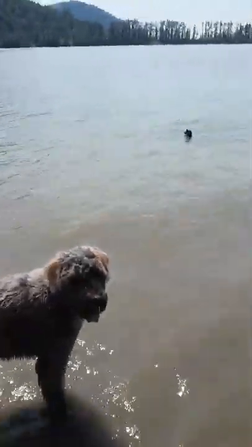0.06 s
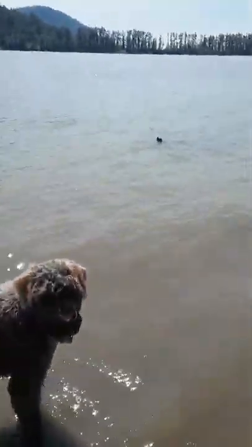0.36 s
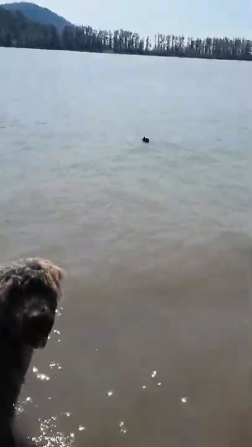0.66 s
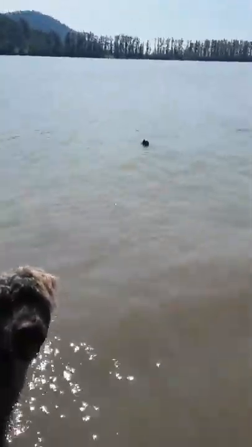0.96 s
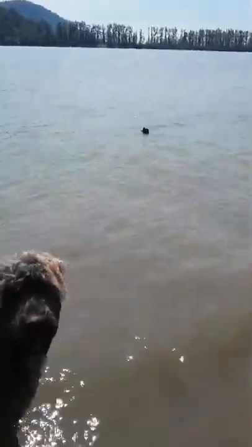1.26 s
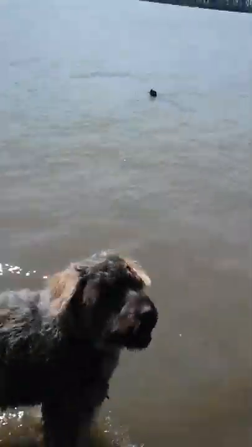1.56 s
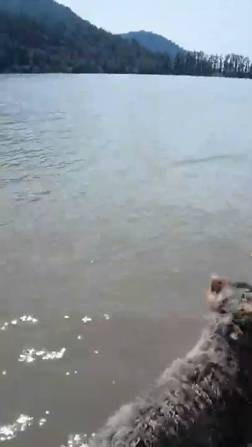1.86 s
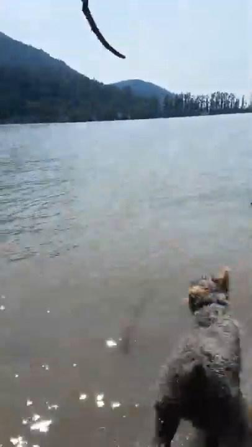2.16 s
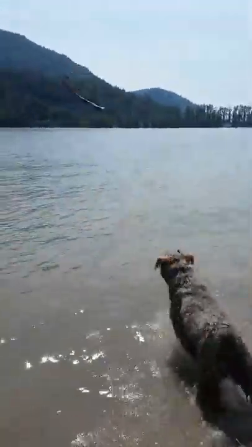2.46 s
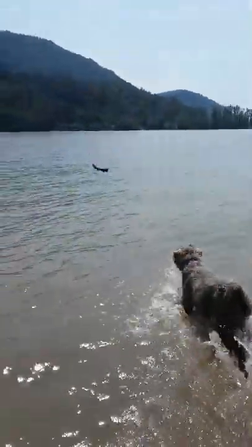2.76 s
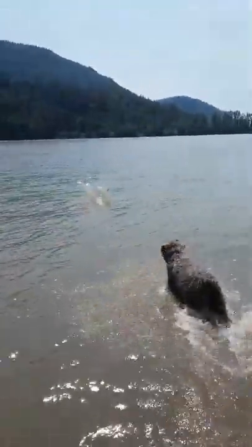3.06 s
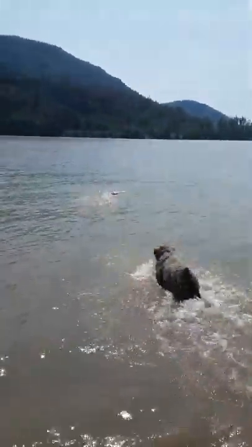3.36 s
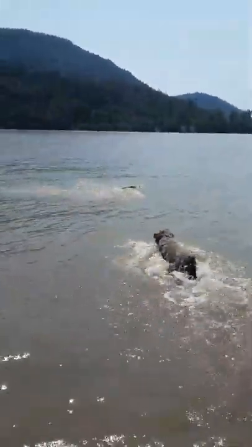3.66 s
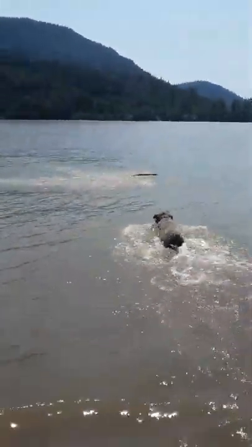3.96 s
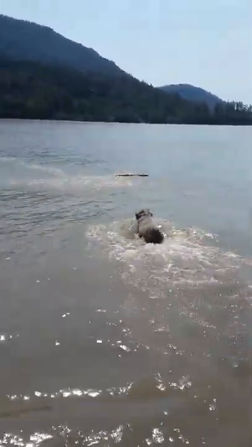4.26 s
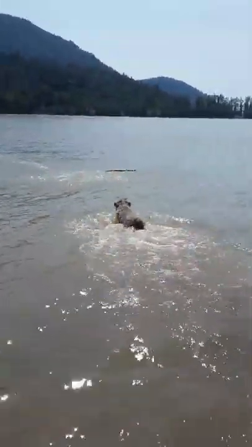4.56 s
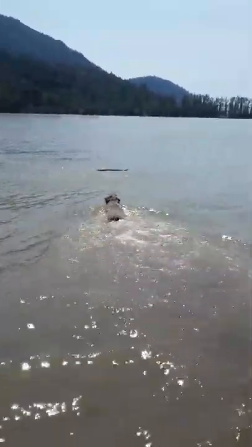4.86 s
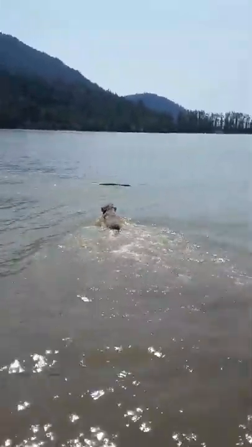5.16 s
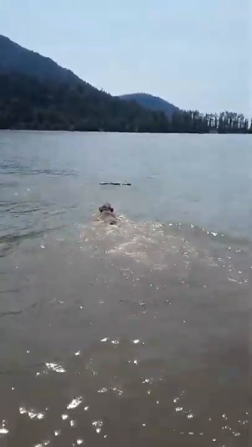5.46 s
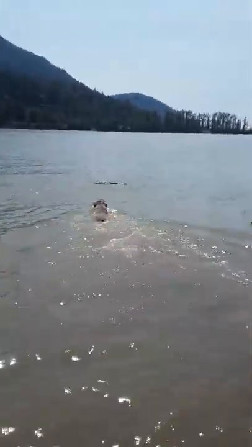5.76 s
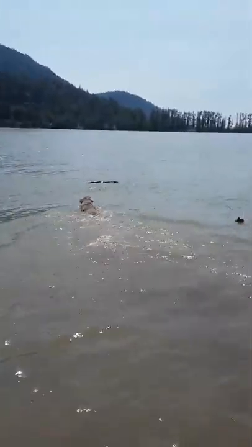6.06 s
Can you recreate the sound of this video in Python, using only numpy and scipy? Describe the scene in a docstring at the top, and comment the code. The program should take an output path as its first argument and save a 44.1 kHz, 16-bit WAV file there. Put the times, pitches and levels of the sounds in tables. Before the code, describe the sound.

Low gusts thump the microphone as a dog bounds through shallow water, then swims off amid small waves.

```python
"""Dog in a windy river

A dog bounds into the shallows of a wide river after a stick and paddles away. Wavelets lap at the shore;
its legs throw spray, churn up ringing bubbles and leave plops and falling drops.
Gusts of wind hit the microphone as a stream of eddies, each a low thump."""
import sys
import numpy as np
from scipy import signal
from scipy.fft import rfft, irfft, next_fast_len
from scipy.io import wavfile
from scipy.ndimage import uniform_filter1d, map_coordinates

SR = 44100
rng = np.random.default_rng(int(sys.argv[2]) if len(sys.argv) > 2 else 0)


def to_wav(sig):
    """Store sig (one row per channel, or 1-D mono) as 16-bit WAV at the path in sys.argv[1].

    Samples outside -1..1 are clipped; the rate is SR.
    """
    pcm = np.clip(np.atleast_2d(sig), -1, 1) * 32767
    pcm = np.round(pcm).astype(np.int16)
    wavfile.write(sys.argv[1], SR, pcm.T)  # frames by channels


N = 278579
TIME = np.arange(N) / SR


def amp(db):
    """Decibels to gain."""
    return 10 ** (np.asarray(db) / 20)


def unit(x):
    """Scale to rms 1."""
    return x / np.sqrt(np.mean(x ** 2) + 1e-20)


def automation(points):
    """A per-sample curve through (time, value) points."""
    return np.interp(TIME, *np.transpose(points))


def wobble(rate):
    """Smooth random modulation, rate knots a second."""
    return map_coordinates(rng.standard_normal(1024), [TIME * rate], mode="wrap")


def swells(peak_s, db, rise, fall, hold_s=0):
    """Envelopes in dB, one a row, that rise, hold and fall; slopes in dB per second."""
    return db - rise * np.maximum(peak_s - TIME, 0) - fall * np.maximum(TIME - peak_s - hold_s, 0)


def together(*levels_db):
    """Power sum in dB of independent layers."""
    rows = np.vstack([np.broadcast_to(level, np.shape(level)[:-1] + (N,)) for level in levels_db])
    power = 10 ** (np.maximum(rows, -150) / 10)
    return 10 * np.log10(power.sum(axis=0))


def filtered(x, response):
    """Zero-phase EQ; response gives the gain at each frequency."""
    size = next_fast_len(N + SR // 2)
    return irfft(rfft(x, size) * response(np.fft.rfftfreq(size, 1 / SR)), size)[:N]


def coloured(x, eq):
    """x through an EQ curve of (Hz, dB) points, at rms 1."""
    points_hz, db = np.transpose(eq)
    return unit(filtered(x, lambda hz: amp(np.interp(np.log(hz + 1), np.log(points_hz), db))))


def scatter(starts, shapes):
    """Mix short sounds, one a row, at their start times."""
    first = np.maximum(np.round(np.reshape(starts, (-1, 1)) * SR).astype(int), 0)
    index = first + np.arange(shapes.shape[1])
    return np.bincount(index.ravel(), shapes.ravel(), N)[:N]


def eddies(times, gains, widths, size=768):
    """Rounded pressure dips; the narrower, the brighter."""
    t = (np.arange(size) - size // 2) / SR
    dips = -gains / np.cosh(np.minimum(np.abs(t / widths), 20))
    return scatter(times - size / 2 / SR, dips)


def port(x, corner_hz):
    """The microphone port passes no steady pressure, so each dip swings back."""
    swing = signal.sosfilt(signal.butter(2, corner_hz, "highpass", fs=SR, output="sos"), x)
    return filtered(swing, lambda hz: 1 / np.sqrt(1 + (56 / (hz + 1)) ** 10))  # sub cut at 56 Hz


# Gust cues: (start [s], hold [s], level [dB])
GUSTS = [(0, 0.091, -25), (0.199, 0.22, -20.5), (0.452, 0.25, -13), (0.722, 0.22, -17), (.93, 0.346, -13.5),
         (1.294, .17, -18), (1.922, 0.12, -15), (2.207, 0.022, -15.5), (2.288, 0.19, -15.5),
         (2.498, .15, -20), (2.712, 0.018, -26), (2.936, 0.4, -35), (3.403, 0.038, -27.5),
         (3.952, 0.055, -26), (4.177, .16, -23.5), (4.463, .05, -27), (4.59, 0.018, -21),
         (4.801, 0.15, -24.5), (5.093, 0.395, -26.5), (5.217, 0.13, -25), (5.511, .12, -20.5),
         (5.671, .02, -22.5), (5.889, 0.091, -25), (5.981, 0.061, -20), (6.188, .03, -28),
         (6.286, 0.034, -23.5)]


def gusting(breeze_db=-43.5, flutter_db=1.5):
    """Wind envelope in dB: gusts hit fast, hold and drop into a turbulent tail over a bed of breeze."""
    start, hold, db = np.transpose(GUSTS)[:, :, None]
    gusts = swells(start, db, rise=700, fall=524, hold_s=hold)
    tails = swells(start, db - 12, rise=700, fall=80, hold_s=hold).max(axis=0)
    return together(gusts, tails, breeze_db) + flutter_db * wobble(rate=19)


def wind(gust_db, width_s=0.00092, narrowing_db=29, scatter_db=5, ceiling=0.49, count=2200):
    """A rumbling stream of eddies: tighter and brighter in a strong gust, sputtering in a light one."""
    times = (np.arange(count)[:, None] + 2 * rng.random((count, 1)) - 1) * N / SR / count
    strength, breadth = rng.standard_normal((count, 2)).T[:, :, None]
    force_db = np.interp(times, TIME, gust_db) + 20
    widths = width_s * np.exp(0.3 * breadth - np.maximum(force_db, -10) / narrowing_db)
    unevenness_db = scatter_db * np.interp(force_db, [0, 6], [1, .65])
    flow = port(eddies(times, amp(unevenness_db * strength), widths), corner_hz=92)
    power = uniform_filter1d(uniform_filter1d(flow ** 2, size=2000), size=2000)
    pressure = amp(gust_db - 0.02) * flow / np.sqrt(np.abs(power) + 1e-9)
    # soft clip: the diaphragm yields less to the hardest pushes
    return pressure / (1 + (pressure / ceiling) ** 4) ** (1 / 4)


# Fader ride of the shoreline bed: (time [s], relative level [dB])
LAPPING = [(0, -38), (.3, -40), (.95, -47.5), (1.35, -41.5), (3.7, -42), (4.1, -38), (4.75, -36),
           (5.3, -42), (5.8, -42), (6.3, -47.5)]


def lapping():
    """Wavelets lap at the shore: splash, spray and mist envelopes in dB."""
    lap_db = automation(LAPPING)
    return lap_db, lap_db - 8, lap_db - 39


def ringing(hz, cycles, rise, size=4000):
    """Bubbles, one a row: each dies 60 dB over some cycles and bends up as it nears the surface."""
    turns = hz * np.arange(size) / SR
    age = turns / cycles
    tone = np.sin(2 * np.pi * turns * (1 + rise * age / 2))
    return tone * amp(-60 * age) * (1 - np.exp(-2 * turns))


def bubbles(low_hz, high_hz, cycles, spread_db, count, size):
    """A cloud of bubbles of random size and strength, at rms 1."""
    when, pitch, strength, life = rng.random((count, 4)).T[:, :, None]
    hz = low_hz * (high_hz / low_hz) ** pitch
    gain = amp(-spread_db * np.log(np.maximum(strength, .01))) * hz / high_hz
    rings = ringing(hz, cycles * (.5 + life), rise=0.31, size=size)
    return unit(scatter(when * N / SR, gain * rings))


# EQ for the body of a splash: (frequency [Hz], gain [dB])
SPLASH_EQ = [(120, -30), (300, 4.5), (600, -2), (900, -2), (1300, -2), (2000, -4), (2600, -5.5),
             (3100, -9.5), (3500, -18), (5000, -20.5), (9000, -37)]
# EQ for the sizzle of spray: (frequency [Hz], gain [dB])
SPRAY_EQ = [(2200, -2), (3600, -3), (4800, -2), (5800, -2.5), (6900, 0), (8500, -6), (10000, -13),
            (12500, -27), (15800, -31)]


def splashing(splash_db, spray_db, mist_db):
    """Sheets of water break into a bubbly body and fizzy spray that surge together, with mist on top."""
    surge = wobble(rate=22)
    gurgle = bubbles(low_hz=614, high_hz=3654, cycles=34, spread_db=2, count=7000, size=1100)
    splash = coloured(gurgle + 2.35 * rng.standard_normal(N), SPLASH_EQ)
    fizz = bubbles(low_hz=2870, high_hz=14870, cycles=40, spread_db=3.5, count=16000, size=200)
    spray = coloured(fizz + 1.5 * rng.standard_normal(N), SPRAY_EQ)
    mist = coloured(rng.standard_normal(N), [(6000, -24), (10000, 0), (13000, -8), (15800, -15)])
    patter = wobble(rate=70)
    return (amp(splash_db + 2 + 0.64 * surge) * splash
            + amp(spray_db + 0.54 + .5 * surge + 0.66 * patter) * spray
            + amp(mist_db + 1.5 * patter) * mist)


# Hard wind hits: (time [s], relative level [dB])
BUFFETS = [(0.19, -3.5), (0.509, -1.5), (0.592, -7), (0.668, -6), (0.828, -5.5), (0.902, -5.5),
           (1.029, -4.5), (1.101, -2), (1.3, -6.5), (1.357, -7), (1.407, -6.5), (1.896, -5), (1.922, -1),
           (1.972, 5), (1.983, -2), (2.034, -7.5), (2.208, -5.5), (2.224, -4.5), (2.279, -6), (2.327, -4.5),
           (2.375, -5), (2.874, -11), (4.513, -3.5), (4.592, -6.5), (5.511, -11.5), (5.582, -5.5),
           (5.624, -8), (5.684, -5)]


def buffets(gust_db, width_s=0.00072, narrowing_db=20):
    """Single hard eddies thump the port, punchiest in strong wind."""
    times, db = np.transpose(BUFFETS)[:, :, None]
    smoothed_db = uniform_filter1d(gust_db, size=8000)
    force_db = np.maximum(np.interp(times, TIME, smoothed_db) + 28.5, 0)
    widths = width_s * np.exp(-force_db / narrowing_db)
    return port(eddies(times + 0.0008, amp(db + 2), widths), corner_hz=80.6)


def puffs(count, t60, attack_s, low_hz, high_hz, size=4000):
    """Wet transients of breaking water: band-passed noise bursts, one a row."""
    t = np.arange(size) / SR
    burst = rng.standard_normal((count, size)) * amp(-60 * t / t60) * (1 - np.exp(-t / attack_s))
    band = signal.butter(2, [low_hz, high_hz], "bandpass", fs=SR, output="sos")
    return signal.sosfilt(band, burst) * np.sqrt(SR / 2 / (high_hz - low_hz))


# Close-up drips: (time [s], level [dB], pitch [Hz])
DROPS = [(0.2553, -30.5, 7040), (0.3227, -34, 6400), (0.538, -39, 4040), (0.5766, -37, 6450),
         (1.1204, -37.5, 4800), (1.166, -31, 6900), (1.2794, -29.5, 6700), (1.339, -36, 6500),
         (1.8056, -22.5, 4700), (3.018, -19, 7000), (4.744, -28.5, 6500), (5.027, -30.5, 6100),
         (5.193, -28.5, 6300)]


def drops():
    """Each drop ticks on the surface, rings a tiny bubble and scatters a brief patter."""
    times, db, hz = np.transpose(DROPS)[:, :, None]
    tick = puffs(len(times), t60=0.015, attack_s=0.0013, low_hz=5500, high_hz=9400)
    ring = ringing(hz, cycles=97, rise=0.073)
    patter = puffs(len(times), t60=0.065, attack_s=0.01, low_hz=5000, high_hz=8400)
    return scatter(times, amp(db) * (tick + ring + amp(-4.5) * patter))


# Foreground wavelets, relative levels: (crest [s], spray [dB], mist [dB], gurgle [dB])
BREAKERS = [(.28, -49, -62, -56.5), (4.72, -41, -68, -45), (5.09, -42.5, -54, -38.5)]


def breakers():
    """Wavelets swell and break close by: spray, mist and gurgle envelopes in dB."""
    crest, spray_db, mist_db, gurgle_db = np.transpose(BREAKERS)[:, :, None]
    swell_db = swells(crest, 0, rise=38, fall=71)
    return swell_db + spray_db, swell_db + mist_db, swell_db + gurgle_db


# Fader ride of the legs underwater, wading in and swimming off: (time [s], relative level [dB])
PADDLING = [(1.55, -59), (1.85, -39), (2.6, -38.5), (3.1, -34), (4.0, -40), (4.4, -58), (6.3, -82)]
# EQ for the low end of stirred water: (frequency [Hz], gain [dB])
CHURN_EQ = [(100, -10), (250, 4), (450, 2), (620, 0.5), (820, 2), (1050, -6.5), (1600, -11), (3000, -30)]


def churning(gurgle_db):
    """Breaking wavelets and the dog's legs drag air under: a dense wash of big, low bubbles."""
    churn_db = together(automation(PADDLING), gurgle_db)
    cloud = bubbles(low_hz=205.7, high_hz=1253, cycles=7.6, spread_db=-0.5, count=3500, size=1400)
    envelope = amp(churn_db + 2 + 1.23 * wobble(rate=7.5))
    return envelope * coloured(cloud + 1.5 * rng.standard_normal(N), CHURN_EQ)


# Big single bubbles: (time [s], relative level [dB], nominal pitch [Hz])
PLOPS = [(1.281, -21, 880), (1.290, -23, 2450), (1.599, -23, 706), (1.807, -14.5, 2600), (1.824, -15, 1174),
         (1.833, -14.5, 1640), (1.894, -14, 904), (2.039, -18, 2630), (2.130, -15.5, 838),
         (2.888, -19.5, 1166), (4.173, -23, 994), (4.356, -23.5, 1190), (4.795, -21, 2730),
         (5.077, -24, 1040), (5.112, -24, 590), (5.126, -25, 776), (5.138, -21.5, 1007),
         (5.335, -28.5, 834), (5.843, -26, 664)]


def plops(tuning=0.92):
    """Air pockets close with a short wet slap and ring with a rising note."""
    times, db, hz = np.transpose(PLOPS)[:, :, None]
    ring = ringing(tuning * hz, cycles=58.7, rise=0.66)
    slap = puffs(len(times), t60=0.08, attack_s=0.0011, low_hz=700, high_hz=2720)
    return scatter(times, amp(db - 2.5) * ring + amp(db - 12.5) * slap)


# The dog's leaps, relative levels: (peak [s], splash [dB], spray [dB], mist [dB], splash fade [dB/s])
LUNGES = [(1.692, -32.5, -41.5, -72, 80), (1.81, -32, -33, -52, 36), (2.108, -31, -33.5, -56, 12),
          (2.25, -36.5, -36, -52, 23.5), (2.44, -34, -40, -59, 12.5), (2.9, -37.5, -42, -54, 19.5)]


def lunges(rise_db_per_s=166):
    """The dog crashes into the water: splash, spray and mist envelopes in dB."""
    peak, splash_db, spray_db, mist_db, fade = np.transpose(LUNGES)[:, :, None]
    body_db = swells(peak, 0, rise_db_per_s, fade)
    airborne_db = swells(peak, 0, rise_db_per_s, fade - 0.5)  # hangs a touch longer
    return body_db + splash_db, airborne_db + spray_db, airborne_db + mist_db


# Paw hits on the surface: (time [s], relative level [dB])
PAW_SLAPS = [(1.805, -27.5), (1.822, -21.5), (2.877, -26)]


def paw_slaps():
    """A paw smacks the water with a short midrange burst."""
    times, db = np.transpose(PAW_SLAPS)[:, :, None]
    smack = puffs(len(times), t60=0.056, attack_s=0.0011, low_hz=850, high_hz=3240)
    return scatter(times, amp(db - 2) * smack)


# Reflection send as the microphone turns: (time [s], gain [share of the direct sound])
REFLECTION_SEND = [(0, 0.037), (1.1, 0.1), (1.45, 0.35), (1.8, 0.043), (2.8, .07), (3.15, 0.21),
                   (3.95, 0.28), (4.3, .04)]


def reflection(water, delay_s=0.000698, drift_s_per_s=0.000202):
    """One close, darker reflection; its growing delay sweeps a gentle comb against the direct sound."""
    darkened = filtered(water, lambda hz: np.exp(-hz / 12000))
    delay = delay_s + drift_s_per_s * TIME
    return automation(REFLECTION_SEND) * np.interp(TIME - delay, TIME, darkened)


def scene():
    """The mono mix: the water layers and their reflection under the wind."""
    lap_splash, lap_spray, lap_mist = lapping()
    breaker_spray, breaker_mist, breaker_gurgle = breakers()
    dog_splash, dog_spray, dog_mist = lunges()
    surface = splashing(splash_db=together(lap_splash, dog_splash),
                        spray_db=together(lap_spray, breaker_spray, dog_spray),
                        mist_db=together(lap_mist, breaker_mist, dog_mist))
    water = surface + churning(breaker_gurgle) + paw_slaps() + plops() + drops()
    gust_db = gusting()
    return (water + reflection(water) + wind(gust_db) + buffets(gust_db))[None]


def record(dry):
    """Master chain: a soft clip rounds the highest peaks, then a brick-wall low-pass trims the top."""
    ceiling, top_hz = 0.95, 15800
    rounded = dry[0] / (1 + np.abs(dry[0] / ceiling) ** 6) ** (1 / 6)
    return filtered(rounded, lambda hz: hz < top_hz)[None]


dry = scene()
out = record(dry)
to_wav(out)
```